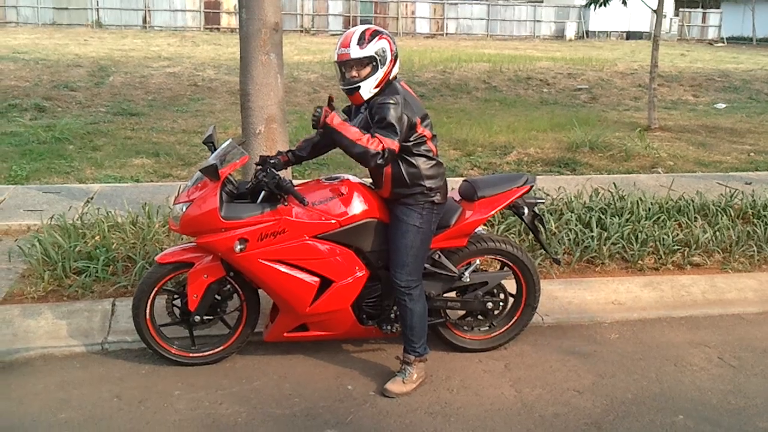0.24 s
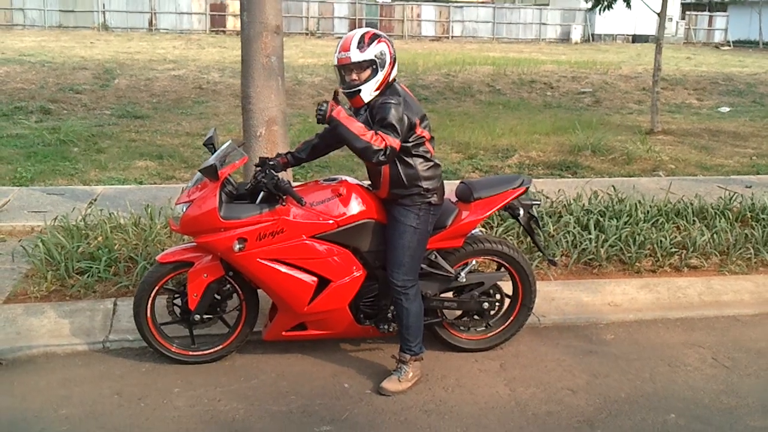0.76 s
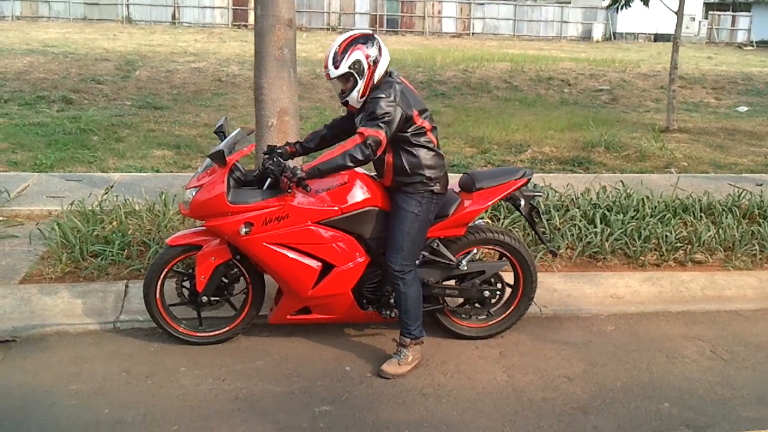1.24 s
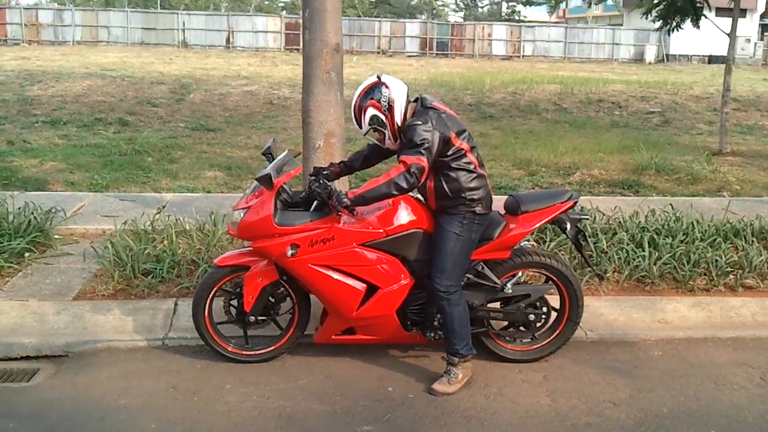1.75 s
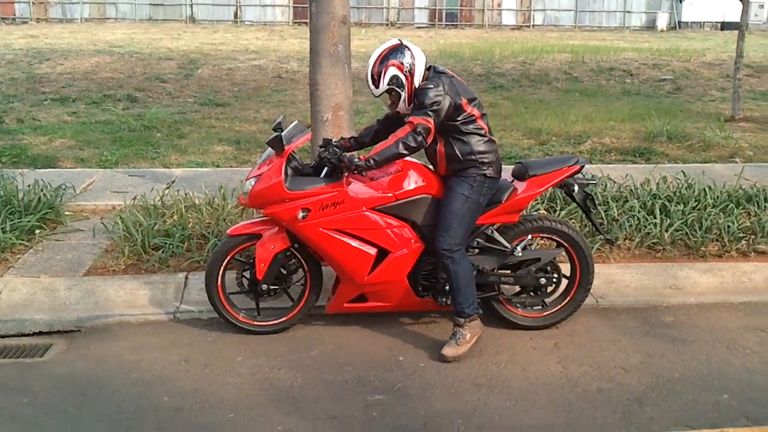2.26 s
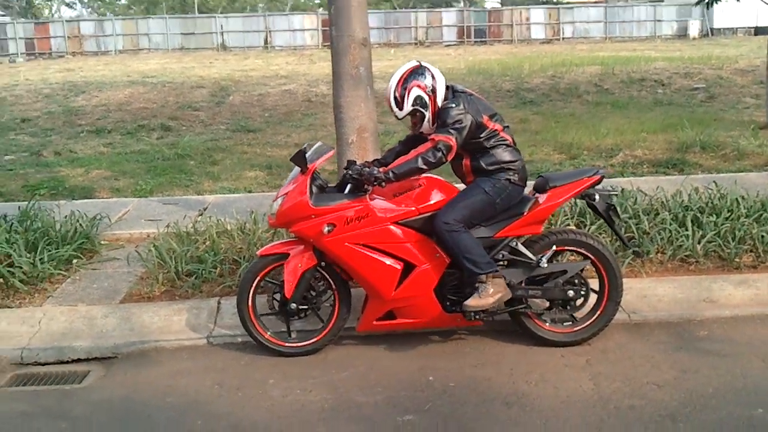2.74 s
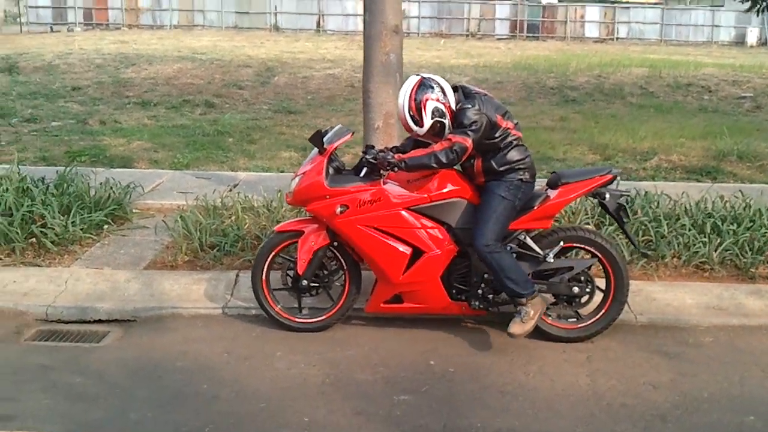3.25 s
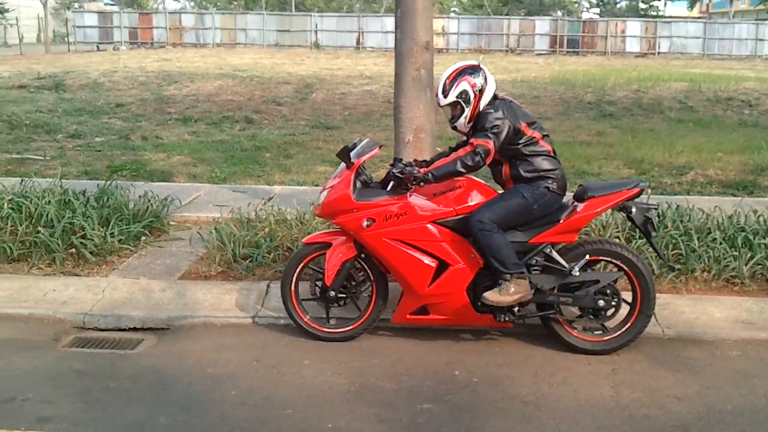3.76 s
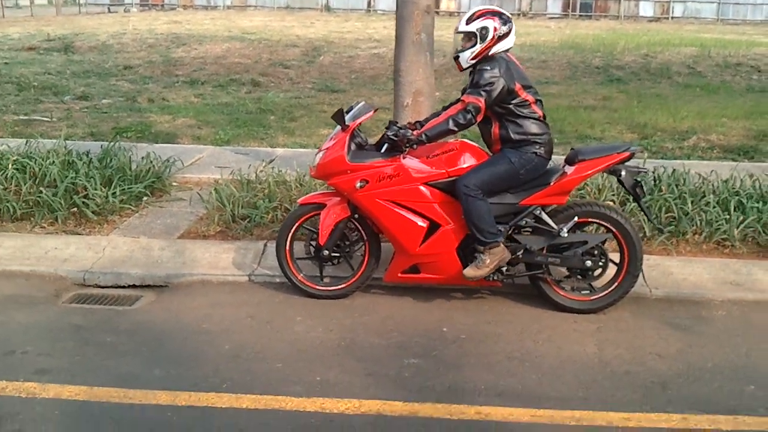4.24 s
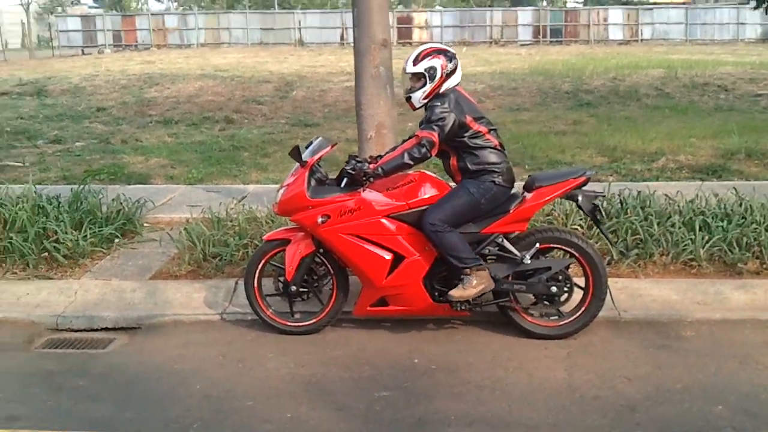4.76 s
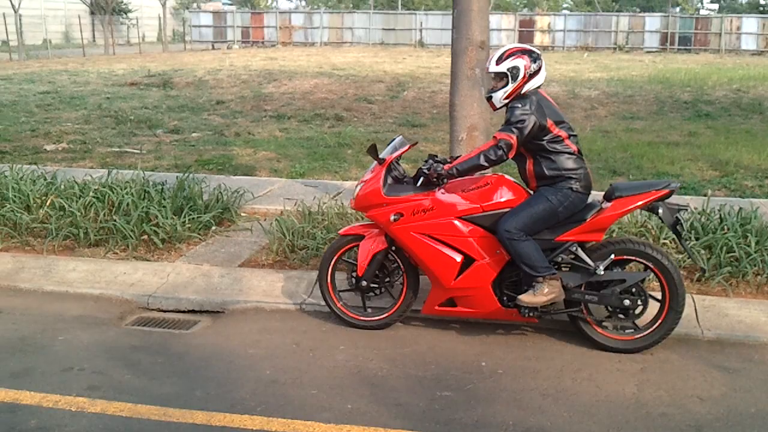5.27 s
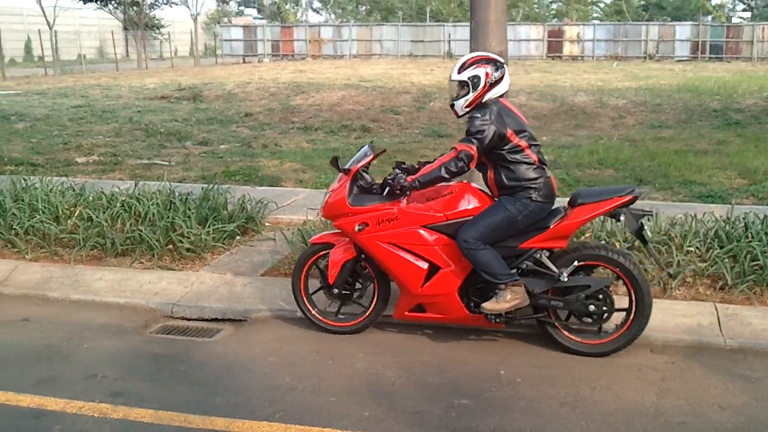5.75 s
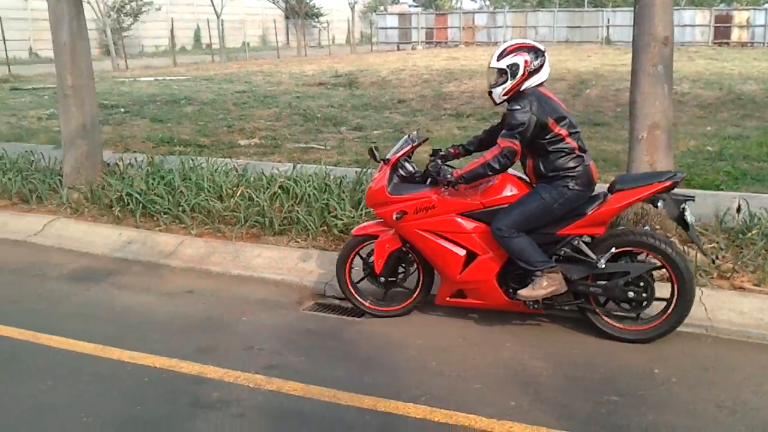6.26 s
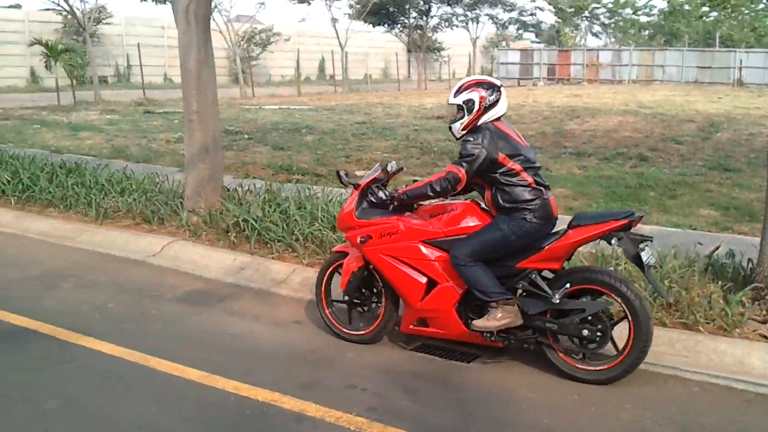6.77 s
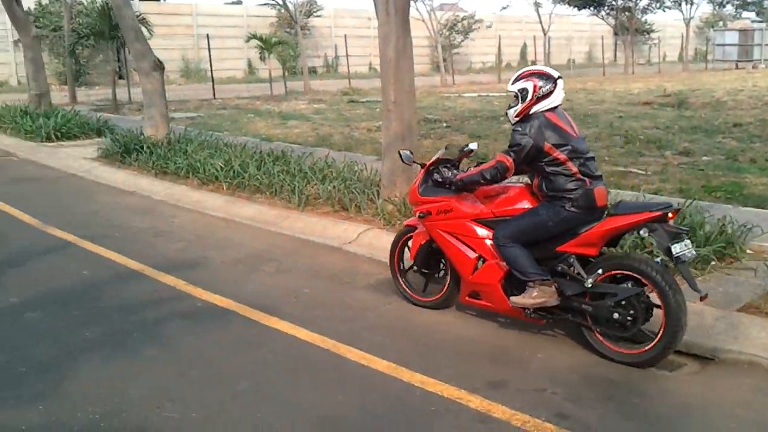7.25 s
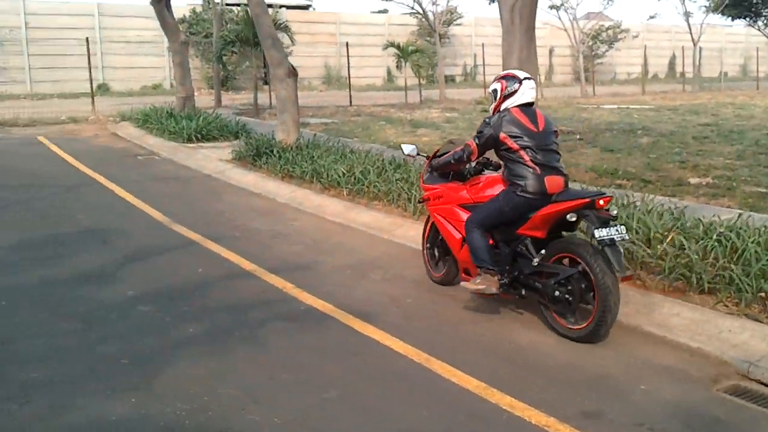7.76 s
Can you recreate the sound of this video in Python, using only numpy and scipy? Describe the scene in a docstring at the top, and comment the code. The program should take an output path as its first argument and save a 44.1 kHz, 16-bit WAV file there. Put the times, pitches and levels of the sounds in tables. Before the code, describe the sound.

Close motorbike engine putters and clatters, revs sharply twice, settles, clicks and clunks into gear, then accelerates away as wind buffets the microphone.

```python
"""Small motorcycle blipped and ridden away

A twin-cylinder motorcycle idles at a kerb, is blipped, clunks into gear and pulls away.
Paired firings a quarter of a cycle apart drive tuned exhaust pulses and gas noise; noise grains ring
casing and covers as valve clatter; a tone locked to the engine is the primary gears' whine under load.
Dry ticks, clutch squeaks and gearbox clunks come on top. Gusts and slaps of wind buffet the bare
microphone of a narrow-band hand-held recorder, over a distant deep rumble."""
import sys
import numpy as np
from scipy import signal
from scipy.fft import rfft, irfft
from scipy.io import wavfile
from scipy.ndimage import uniform_filter1d

SR = 44100
rng = np.random.default_rng(int(sys.argv[2]) if len(sys.argv) > 2 else 0)


def rack_gain(trim_db):
    """Turn a fader trim in dB into the linear factor to multiply a signal by."""
    fader = np.asarray(trim_db, float)
    return 10 ** (fader / 20)


def to_wav(sig):
    """Store sig (one row per channel, or 1-D mono) as 16-bit WAV at the path in sys.argv[1].

    Samples outside -1..1 are clipped; the rate is SR.
    """
    pcm = np.clip(np.atleast_2d(sig), -1, 1) * 32767
    pcm = np.round(pcm).astype(np.int16)
    wavfile.write(sys.argv[1], SR, pcm.T)  # frames by channels


N = 353241

IDLE_SPEED = 9.2  # four-stroke cycles per second
IDLE_OPENING = .8  # effective throttle at idle, 0-1
TWIST_S, TURN_S = .05, .1  # length of a throttle movement; of a change of gear load or late level change


def rms_one(x):
    """Scales the whole sound to rms 1."""
    return x / np.sqrt(np.mean(x ** 2) + 1e-20)


def in_time(rows):
    """Draws straight lines between timed rows, one curve per column."""
    s, *columns = np.transpose(rows)
    return [np.interp(np.arange(N) / SR, s, c) for c in columns]


def steady(x, window_s):
    """Evens out the slow level to rms 1."""
    return x / np.sqrt(uniform_filter1d(x ** 2, size=int(window_s * SR)) + 1e-12)


def band(x, low_hz, high_hz):
    """Gentle band-pass."""
    return signal.sosfilt(signal.butter(2, [low_hz, high_hz], "band", fs=SR, output="sos"), x + 1e-18)


def high_pass(x, hz):
    """Second-order bass cut."""
    return signal.sosfilt(signal.butter(2, hz, "high", fs=SR, output="sos"), x)


def resonance(x, hz, width_hz):
    """Two-pole peak of gain 1."""
    r = np.exp(-np.pi * width_hz / SR)
    turn = 2 * np.pi * hz / SR
    return signal.lfilter([(1 - r * r) / 2, 0, (r * r - 1) / 2], [1, -2 * r * np.cos(turn), r * r], x)


def body(x, peaks, flicker_db=0):
    """Parallel steep resonances with alternating signs, each slowly flickering in strength on its own."""
    slow = rng.standard_normal((len(peaks), 100))
    out = np.zeros(N)
    for k, (hz, width_hz, db) in enumerate(peaks):
        flicker = flicker_db * np.interp(np.linspace(0, 99, N), np.arange(100), slow[k])
        ring = resonance(resonance(x, hz, width_hz), hz, width_hz)
        out += (-1) ** k * rack_gain(db + flicker) * ring
    return out


def strokes(cycle, at, scatter_db):
    """One click each time the cycle passes the given fraction, each with its own strength."""
    marks = np.diff(np.floor(cycle - at), prepend=np.floor(cycle[0] - at)) > 0
    return marks * rack_gain(scatter_db * rng.standard_normal(N))


def dying(x, decay_s):
    """Each click leaves an exponential tail."""
    return signal.lfilter([1], [1, -np.exp(-1 / (decay_s * SR))], x)


def bursts(rows, length):
    """Sample index and time axis for a short sound at each row's start."""
    return [(round(row[0] * SR), np.arange(length) / SR) for row in rows]


def wavelet(clicks, hz, spread_s, turn):
    """Each click becomes about one swing of a tone, centred on the click."""
    t = np.arange(-700, 701) / SR
    swing = np.exp(-.5 * (t / spread_s) ** 2) * np.sin(2 * np.pi * hz * t + turn)
    return signal.fftconvolve(clicks, swing, "same")


def after_s(s, length_s):
    """Rises from 0 to 1 around a moment."""
    return np.clip((np.arange(N) / SR - s) / length_s + .5, 0, 1)


def opening(speed):
    """Effective throttle: the wider of the rider's twists and of what the idle jet lets through."""
    # Twists of the throttle. Each row: open in seconds, shut in seconds, opening 0-1.
    twists = [(1.58, 2.065, 1), (2.405, 2.605, 1), (3.62, 3.85, .7), (3.85, 4.195, 1), (4.68, 7.4, 1),
              (7.4, 8.1, .8)]
    shut_opening, jet_power = .15, 8  # shut, the engine fires again only near idle speed
    near_idle = np.minimum(IDLE_SPEED / speed, 1) ** jet_power
    idle = shut_opening + (IDLE_OPENING - shut_opening) * near_idle
    twisted = sum(wide * (after_s(s, TWIST_S) - after_s(shut, TWIST_S)) for s, shut, wide in twists)
    return np.maximum(idle, twisted)


def level_db(law, speed, throttle):
    """A level from speed, throttle, speeding up, gear load and a late change near the end."""
    clutch_bites_s, late_s = 5.14, 7.37
    gaining = uniform_filter1d(np.maximum(np.gradient(speed), 0), size=6000) * SR / 10
    shut = uniform_filter1d(np.maximum(1 - throttle / IDLE_OPENING, 0), size=4000)
    return np.dot(law, [np.ones(N), np.log2(speed / IDLE_SPEED), shut, gaining,
                        after_s(clutch_bites_s, TURN_S), after_s(late_s, TURN_S)])


def exhaust(cycle, speed, throttle):
    """Paired firings, the second stronger at idle, suck and push; shut throttle leaves soft later thuds."""
    # Exhaust pulses fall slightly later against the gear whine near the end.
    # Each row: time in seconds, lag in seconds.
    lag_rows = [(0, 0), (7.2, 0), (7.45, .0045), (8.01, .0045)]
    # Exhaust level. Columns in dB: at idle, per octave of speed, throttle shut, per 10 cycles/s2 gained,
    # in gear, near the end.
    exhaust_law = (-42.5, 6.5, -4.5, 0.36, -1, -1.5)
    # Turbulence against the clean pulses. Columns in dB: at idle, per octave of speed, throttle shut,
    # per 10 cycles/s2 gained, in gear, near the end.
    rough_law = (-1, -3.5, 3, -.8, -7, 4)
    lag, = in_time(lag_rows)
    heard = np.interp(np.arange(N) - (lag - .0006) * SR, np.arange(N), cycle)

    fired = strokes(heard, 0, scatter_db=.8)
    fired = fired + rack_gain(80 / speed - 6.5) * strokes(heard, .26, scatter_db=1.2)
    pumped = strokes(heard, .17, scatter_db=2)
    pumped = pumped + rack_gain(-2) * strokes(heard, .39, scatter_db=2)
    pumped = pumped + rack_gain(-9) * strokes(heard, .88, scatter_db=2)
    firing, pumping = throttle * fired, (1 - throttle) * pumped

    pulse = wavelet(firing, 175, .0019, turn=-1.5)
    # the steep front of the pulse, sharper at speed
    edge = rack_gain(-4) * wavelet(firing, 340, .0009, turn=-.6)
    edge = edge + rack_gain(-15) * wavelet(firing, 700, .0005, turn=0) * np.minimum(speed / 25, 1)
    thud = rack_gain(8.5) * wavelet(pumping, 116, .0012, turn=3.57)
    pipe = high_pass(pulse + edge, 80) + thud  # a small outlet radiates little bass
    # the silencer rings on, deepest at idle
    pipe = pipe + rack_gain(4.5) * resonance(pipe, 130, 70)
    pipe = pipe + rack_gain(11.5) * resonance(pipe * (10 / speed) ** 2, 78, 31)

    # turbulent gas after each pulse
    puff = dying(firing + pumping, .06)
    rumble = band(band((puff + .58) * rng.standard_normal(N), 44, 260), 53, 760)
    rough = rack_gain(level_db(rough_law, speed, throttle)) * steady(rumble, .2)
    return rack_gain(level_db(exhaust_law, speed, throttle)) * (steady(pipe, .086) + rough)


def clatter(cycle, speed, throttle):
    """Valve and chain contacts as dense grains, swelling with each pair of firings, ring casing and covers."""
    # Casing resonances. Each row: centre in Hz, width in Hz, relative level in dB.
    casing_peaks = [(1346, 200, -4.5), (1673, 277, -2.5), (2295, 580, -16), (2980, 484, -3),
                    (3397, 257, -5), (3823, 320, -2.5)]
    # Cover and fin resonances. Each row: centre in Hz, width in Hz, relative level in dB.
    cover_peaks = [(4218, 440, 5.5), (4692, 534, 3), (5550, 720, 3), (6237, 780, 0.5), (7280, 1330, -2.5),
                   (8410, 1050, 1)]
    # Hollow ring of the airbox, clearest at idle. Each row: centre in Hz, width in Hz, relative level in dB.
    airbox_peaks = [(429, 115, 1), (897, 290, 1.5)]
    # Intake growl on open throttle. Each row: centre in Hz, width in Hz, relative level in dB.
    intake_peaks = [(1016, 143, 0)]
    # Casing level. Columns in dB: at idle, per octave of speed, throttle shut, per 10 cycles/s2 gained,
    # in gear, near the end.
    casing_law = (-40.5, 4.5, -1.5, 0.49, -2.5, -2.5)
    # Cover hiss level. Columns in dB: at idle, per octave of speed, throttle shut,
    # per 10 cycles/s2 gained, in gear, near the end.
    hiss_law = (-40, 7.5, 0, 0.47, 0.58, -1.5)
    # Clutch lever held in: the rattle hushes, most between the resonances.
    # Columns: from in seconds, to in seconds, nominal change in dB.
    lever = (3.25, 3.83, -8)
    hush_db = lever[2] * (after_s(lever[0], TURN_S) - after_s(lever[1], TWIST_S))
    casing_db = level_db(casing_law, speed, throttle) + .36 * hush_db
    hiss_db = level_db(hiss_law, speed, throttle) + .2 * hush_db

    knock = throttle * (strokes(cycle, .02, scatter_db=1.2) + strokes(cycle, .27, scatter_db=1.2))
    after = dying(knock, .0027)
    lumpy = np.cos(2 * np.pi * (cycle - .13)) * 9 / speed
    grains = rng.standard_normal((3, N)) * rack_gain(2 * np.minimum(rng.exponential(1, (3, N)), 4))

    casing = body(grains[0] * (1 + .28 * lumpy + .6 * after), casing_peaks, flicker_db=1.5)
    casing = casing + rack_gain(hush_db - 14.5) * band(grains[0] * (1 + .18 * lumpy), 440, 4300)
    hollow = body(grains[1] * (1 + .22 * lumpy + .5 * after) + 25 * knock, airbox_peaks)
    casing = casing + hollow * (IDLE_SPEED / speed) ** .4 * (.61 + .38 * throttle)
    # the growl grows with the air drawn
    drawn = throttle * speed / 25
    growl = rack_gain(-9.5) * body((grains[2] * (1 + 1.9 * after) + 130 * knock) * drawn, intake_peaks)
    covers = body(grains[1] * (1 + .23 * lumpy + .33 * after), cover_peaks, flicker_db=1)
    covers = covers + rack_gain(hush_db - 16.5) * band(grains[2], 2700, 13000)
    return rack_gain(casing_db) * steady(casing + growl, .79) + rack_gain(hiss_db) * steady(covers, .088)


def whine(cycle, speed, throttle):
    """Tooth-mesh tone; uneven crank speed wavers it once a cycle, and changing speed rattles the teeth."""
    # Whine level in gear. Each row: time in seconds, level in dB.
    geared_db = [(5.15, -50), (5.35, -31.5), (5.55, -29), (5.75, -39), (6.25, -37), (6.5, -31.5),
                 (7.15, -31), (7.4, -39.5), (7.6, -32.5), (8.01, -33)]
    # Harmonics of the tooth mesh. Each row: multiple of the mesh frequency, level in dB before colouring.
    orders = [(1, 0), (2, -10), (3, -8.5), (4, -10)]
    # How well the casing radiates the overtones. Each row: frequency in Hz, gain in dB.
    colour = [(800, 0), (1400, -2), (1950, -9), (2400, 1), (2900, -6), (3500, 1), (4500, 0), (5500, -6)]
    # Unloaded gears whine faintly, louder with speed, open throttle and speeding up. Columns in dB:
    # at idle, per octave of speed, throttle shut, per 10 cycles/s2 gained, in gear, near the end.
    free_law = (-67, 13, -20, 2.5, 0, 0)
    teeth_per_cycle = 46
    wander = rms_one(band(rng.standard_normal(N), 13, 60))
    waver = (.4 + 150 / speed ** 2) * np.sin(2 * np.pi * cycle + 1.5) + .4 * wander
    phase = 2 * np.pi * teeth_per_cycle * cycle + waver
    throb = 1 + .25 * np.cos(2 * np.pi * (cycle - .2)) + .15 * np.cos(8 * np.pi * cycle)

    tone = np.sin(phase)
    for k, db in orders[1:]:
        radiated_db = np.interp(k * teeth_per_cycle * speed, *np.transpose(colour))
        tone += rack_gain(db + radiated_db) * np.sin(k * phase)
    # rattle: the same tone shaken at random in strength and phase
    change = uniform_filter1d(np.abs(np.gradient(speed)) * SR, size=6000)
    loose = np.clip(change / 45, .15, .9)
    shake = signal.sosfilt(signal.butter(2, 45, fs=SR, output="sos"), rng.standard_normal((2, N)))
    rattle = rms_one(shake[0] * np.sin(phase) + shake[1] * np.cos(phase)) / np.sqrt(2)

    unloaded = np.arange(N) < geared_db[0][0] * SR
    db = np.where(unloaded, level_db(free_law, speed, throttle), in_time(geared_db)[0])
    mixed = np.sqrt(1 - loose ** 2) * tone + loose * rattle
    return rack_gain(uniform_filter1d(db, size=3000)) * throb * mixed


def gust_db():
    """Each gust rises fast, holds and dies away; the strongest at any moment counts."""
    # Gusts on the microphone. Each row: start in seconds, length in seconds, buffeting level in dB.
    gusts = [(0, 0.12, -39), (1.287, 0.039, -40), (3.695, 0.065, -40), (5.104, 0.072, -26),
             (6.26, 0.21, -31.5), (6.584, 0.18, -26.5), (6.886, 0.32, -34), (7.296, 1, -41),
             (7.684, 0.075, -35)]
    rise_db_per_s, fall_db_per_s, calm_db = 335, 145, -52.5
    t = np.arange(N) / SR
    levels = [np.full(N, calm_db)]
    for s, length, db in gusts:
        rise = rise_db_per_s * np.maximum(s - t, 0)
        fall = fall_db_per_s * np.maximum(t - s - length, 0)
        levels.append(db - rise - fall)
    return np.max(levels, axis=0)


def wind():
    """Eddies hit the port as lumpy low pushes over a deep rumble; the hardest are single sharp slaps."""
    # Hardest wind slaps. Each row: time in seconds (the centre lands 2 ms later), nominal peak in dB.
    slap_rows = [(1.301, -22), (5.17, -22), (5.191, -19), (5.197, -15.5), (5.208, -25), (6.241, -27),
                 (6.377, -11.5), (6.463, -17), (6.588, -17.5), (6.644, -12), (6.744, -17), (6.772, -13),
                 (6.854, -15), (6.895, -16.5), (7.065, -15.5), (7.676, -17.5), (7.736, -21)]
    struck = rng.random(N) < 300 / SR  # about 300 eddies per second
    eddies = struck * rng.choice([-1, 1], N) * rack_gain(4 * np.minimum(rng.exponential(1, N), 3))
    buffet = rms_one(band(band(eddies, 120, 335), 60, 1100)) + rack_gain(-10) * rms_one(band(eddies, 32, 76))
    slaps = np.zeros(N)
    slaps[[round(s * SR) + 90 for s, db in slap_rows]] = rack_gain(np.array(slap_rows)[:, 1])
    slapped = wavelet(slaps, 330, .00085, turn=-.8) + rack_gain(-9) * wavelet(slaps, 640, .0006, turn=-.8)
    return rack_gain(gust_db()) * buffet + slapped


def outdoors():
    """Steady far-off noise, shaped in its spectrum to a deep rumble."""
    # Colour of the distant rumble. Each row: frequency in Hz, relative spectral level in dB.
    rumble_colour = [(15, -55), (25, -25), (59, -16), (90, 1), (120, -29), (200, -120)]
    hz, shape = np.maximum(np.fft.rfftfreq(N, 1 / SR), 1), np.array(rumble_colour)
    gain = rack_gain(np.interp(np.log(hz), np.log(shape[:, 0]), shape[:, 1]))
    return rack_gain(-55) * rms_one(irfft(rfft(rng.standard_normal(N)) * gain, N))


def ticks():
    """A millisecond of bright ringing with a faint echo tail."""
    # Sharp dry ticks. Each row: start in seconds, peak of the snap in dB, ring in Hz.
    tick_rows = [(1.7212, -4.5, 5600), (2.9520, -3.5, 5900), (3.165, -21, 6500), (3.4505, -17, 6500),
                 (3.8210, 5, 6250)]
    out = np.zeros(N)
    tails = rng.standard_normal((len(tick_rows), 900))
    for (i, t), (s, db, hz), tail in zip(bursts(tick_rows, 900), tick_rows, tails):
        ring = np.sin(2 * np.pi * hz * t)
        ring = ring + .4 * np.sin(2 * np.pi * .78 * hz * t) + .25 * np.sin(2 * np.pi * 1.25 * hz * t)
        snap = np.exp(-((t - .0016) / .0006) ** 2) * ring
        snap = snap + .25 * np.exp(-((t - .0014) / .00012) ** 2)  # a tiny one-sided push
        echo = .27 * (t > .002) * np.exp(-t / .004) * band(tail, 3500, 8700)
        out[i:i + 900] += rack_gain(db) * (snap / np.abs(snap).max() + echo)
    return out


def squeaks():
    """Brief stick-slip tones of the clutch, gliding in pitch."""
    # Clutch squeaks. Each row: start in seconds, length in seconds, first pitch in Hz, last pitch in Hz,
    # relative level in dB.
    squeak_rows = [(3.008, 0.05, 1484, 1306, -36), (4.435, 0.056, 1430, 1325, -35.5)]
    out = np.zeros(N)
    for s, length, from_hz, to_hz, db in squeak_rows:
        shape = np.hanning(int(length * SR))
        phase = 2 * np.pi * np.cumsum(np.linspace(from_hz, to_hz, len(shape))) / SR
        out[round(s * SR):][:len(shape)] += rack_gain(db + 5.5) * shape * np.sin(phase)
    return out


def gear_change():
    """Each clunk is a short grinding burst into the gearbox modes, dull or bright."""
    # Gear-change clunks. Each row: start in seconds, relative level in dB, 60 dB decay of the grind in
    # seconds, relative level of the low modes in dB (-17 leaves them as they are).
    clunk_rows = [(4.4975, -6.5, .08, -15), (4.533, -14, .04, -22), (4.565, -18, .05, -17),
                  (4.58, -21, .12, -20), (4.66, -17.5, .075, -15), (4.779, -17.5, .06, -28)]
    # Gearbox modes. Each row: frequency in Hz, relative level in dB, ring setting in seconds
    # (about four times the mode's own 60 dB decay).
    modes = [(453, -3, 0.091), (790, -11, 0.029), (1320, -6, 0.013), (3100, -15, 0.021),
             (4080, -13.5, 0.0077), (4480, 4, 0.05), (5560, 1, 0.013), (5880, -1, 0.057),
             (7630, -3.5, 0.0077)]
    out = np.zeros(N)
    grits = rng.standard_normal((len(clunk_rows), 6000))
    for (i, t), (s, db, t60, low_db), grit in zip(bursts(clunk_rows, 6000), clunk_rows, grits):
        burst = grit * np.minimum(t * 500, 1) * rack_gain(-60 * t / t60)  # 2 ms attack
        rings = rack_gain(-19.5) * band(burst, 1400, 9200)
        for hz, level, ring_s in modes:
            rings = rings + rack_gain(level + (low_db + 17) * (hz < 2200)) * resonance(burst, hz, 8.64 / ring_s)
        out[i:i + 6000] += rack_gain(db + 8) * rings
    return out


def scene():
    """One engine cycle drives exhaust, clatter and whine; the other sounds are laid over it."""
    # Engine speed. Each row: time in seconds, four-stroke cycles per second.
    speed_rows = [(0, 9.26), (1.57, 9.16), (1.73, 12.97), (2.05, 27.82), (2.41, 20.72), (2.62, 27.66),
                  (2.93, 22.97), (3.12, 16.22), (3.48, 9.83), (3.93, 15.55), (4.15, 26.11), (4.36, 22.42),
                  (4.77, 11.49), (5.04, 21.4), (5.34, 28.98), (5.43, 29.81), (5.9, 26.11), (6.62, 24.43),
                  (6.82, 24.79), (7.26, 29.87), (7.41, 27.96), (7.53, 24.59), (7.69, 21.79), (7.85, 20.61),
                  (8.01, 21.13)]
    flywheel_s = .1  # the crank cannot change speed at a corner
    speed = uniform_filter1d(in_time(speed_rows)[0], size=int(flywheel_s * SR), mode="nearest")
    cycle = -.34 + np.cumsum(speed) / SR
    throttle = opening(speed)
    engine = exhaust(cycle, speed, throttle) + clatter(cycle, speed, throttle)
    machine = engine + whine(cycle, speed, throttle) + ticks() + squeaks() + gear_change()
    return (machine + wind() + outdoors())[None]


def band_limit(x):
    """A steep low-pass at the top of the band."""
    return signal.sosfilt(signal.butter(12, 16000, fs=SR, output="sos"), x)


def record(dry):
    """Bass roll-off, an input that clips, a steep top cut whose overshoot clips once more."""
    input_limit, overload = .72, .76  # of full scale
    stop_hz = 10250  # 80 dB down from here up
    thin = high_pass(dry, 60)
    clipped = np.clip(thin, -input_limit, input_limit)
    narrow = signal.sosfilt(signal.cheby2(10, 80, stop_hz, fs=SR, output="sos"), clipped)
    return band_limit(np.clip(narrow, -overload, overload))


dry = scene()
out = record(dry)
to_wav(out)
```